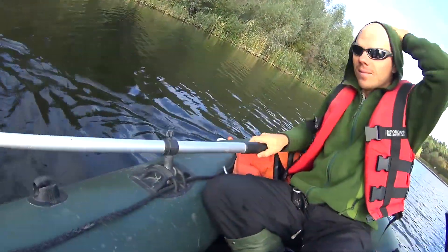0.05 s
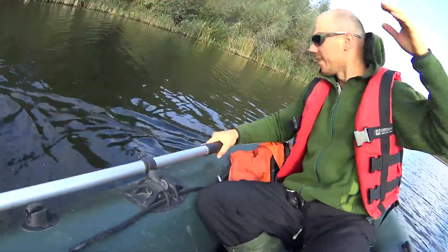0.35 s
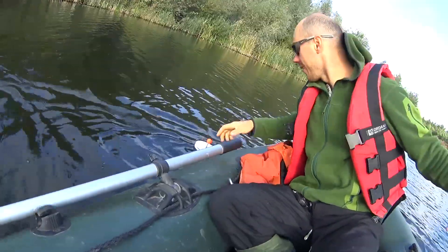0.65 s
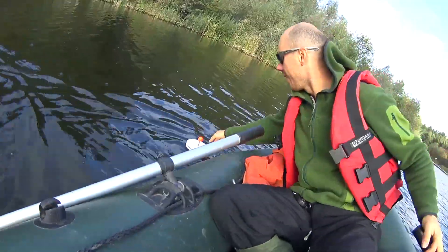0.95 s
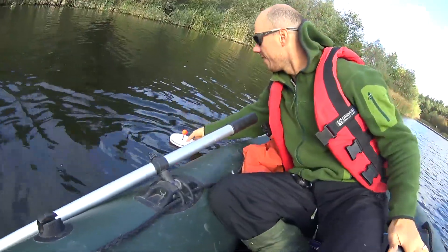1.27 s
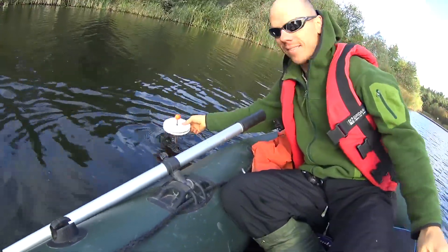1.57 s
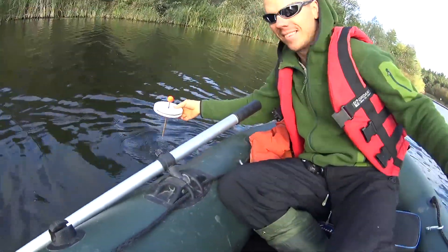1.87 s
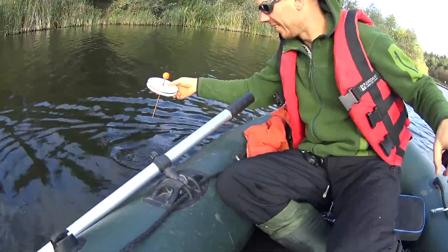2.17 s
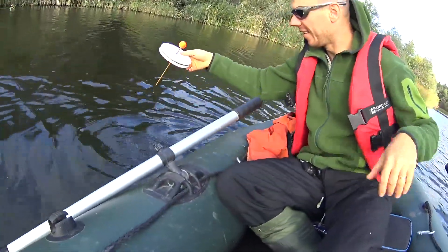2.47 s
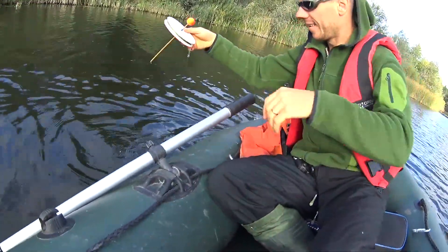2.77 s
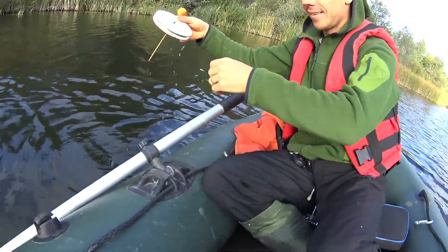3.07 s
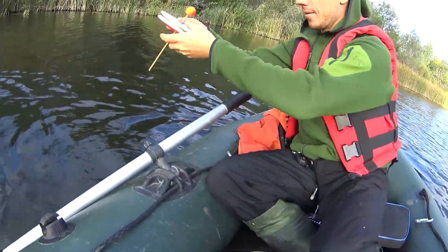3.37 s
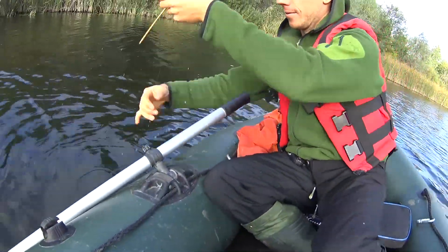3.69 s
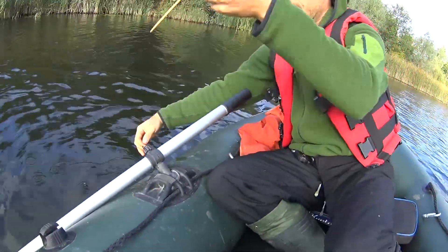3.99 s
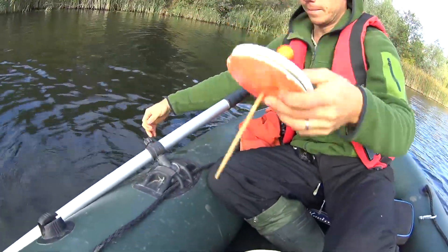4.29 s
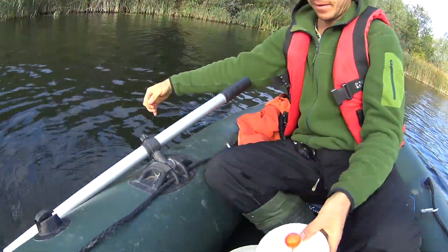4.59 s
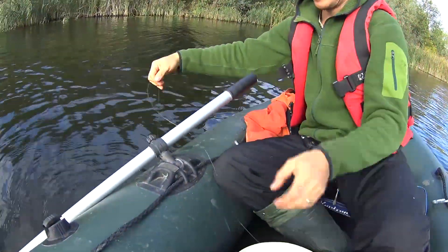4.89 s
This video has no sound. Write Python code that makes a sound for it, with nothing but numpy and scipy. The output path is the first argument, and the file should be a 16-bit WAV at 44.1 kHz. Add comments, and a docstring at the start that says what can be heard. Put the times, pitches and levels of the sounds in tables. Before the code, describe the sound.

Oar knocks and small splashes beside an inflatable boat, with light wind puffs, rustling clothes and a brief plastic clatter.

```python
"""An oar knocks and clatters in its oarlock, heard from an inflatable boat drifting on a quiet river.
Water laps and drips as a fishing float is lifted out, sleeves rustle, and the plastic float clatters down.
Each knock is a short crack that sets the struck thing ringing; the water is tiny ringing bubbles and spray.
Light wind puffs on the microphone, and a small bird sings from the bank."""
import sys
import numpy as np
from scipy import signal
from scipy.fft import rfft, irfft
from scipy.io import wavfile

SR = 44100
rng = np.random.default_rng(int(sys.argv[2]) if len(sys.argv) > 2 else 0)


def wrap_up_sound(samples):
    """Save the sound to the file named by the first command line argument, as 16-bit audio."""
    columns = np.atleast_2d(samples).T
    # keep every value between -1 and 1, then stretch to whole-number steps
    tamed = np.clip(columns, -1, 1)
    steps = np.round(tamed * 32767).astype(np.int16)
    wavfile.write(sys.argv[1], SR, steps)


N = 222308
TIME = np.arange(N) / SR
AGE = TIME[:SR // 4]  # seconds since one short sound began

# A ring time (t60) is how long a sound takes to fade by 60 dB. Pan is left minus right.
# Blows on the oar, oarlock and float. Each row: start in seconds, crack level in dB, crack pitch in Hz,
# crack ring time in seconds, ringing level in dB above the crack, brightness in Hz,
# chatter time in seconds, pan in dB.
OAR_THUDS = [(.3469, -7.5, 870, 0.0038, -3.5, 9000, 0.00032, 2.5),
             (.3852, -25.5, 1010, 0.0049, -2.5, 14000, 0.00087, 4),
             (.4435, -33.5, 695, 0.0065, 0.5, 6000, .002, -1)]
OARLOCK_CLACKS = [(.7665, -34.5, 400, 0.0082, 9.5, 6140, 0.0093, 3),
                  (.7745, -28, 495, 0.034, 8, 9000, 0.0081, 4.4),
                  (.783, -24.5, 506, 0.02, -12, 5500, .008, 1.7),
                  (.8772, -21.5, 2500, 0.0059, 3.5, 18000, 0.0087, 9.4),
                  (.8853, -11.5, 1610, 0.0065, -7.5, 8000, 0.0033, 4.1),
                  (.8882, -9, 2610, 0.0052, -7.5, 7900, 0.0018, 5.6),
                  (.8925, -22.5, 3000, 0.014, 0.5, 7960, 0.016, 3),
                  (.899, -38, 3200, .01, -8, 9000, .004, 4),
                  (.9103, -23, 1250, 0.016, -3, 4500, 0.0033, 6.9)]
FLOAT_KNOCKS = [(4.8022, -24.5, 2230, 0.008, -6, 4000, 0.0017, -6),
                (4.8045, -25, 1550, 0.038, 4.5, 3800, 0.0011, -3),
                (4.8978, -19.5, 2380, 0.013, 11, 20000, 0.0033, -1),
                (4.9005, -11.5, 1600, 0.015, 2, 9900, 0.0033, -3),
                (4.9075, -17.5, 674, 0.035, 0, 3500, 0.0021, 0),
                (4.9145, -25, 1440, 0.01, 11.5, 14000, 0.0052, -1.5),
                (4.931, -18.5, 1020, 0.013, -1, 14000, 0.0044, -0.5),
                (4.94, -24.5, 1017, 0.053, 3, 1980, 0.0022, -4),
                (4.9675, -26.5, 1460, 0.027, -2, 3000, 0.0039, -3),
                (5.0283, -7, 2490, 0.0018, -7, 3040, 0.0018, -3),
                (5.031, -22.5, 177, 0.1, 1, 2620, 0.0049, 0)]
# The tones each thing rings with. Each row: pitch in Hz, relative level in dB, ring time in seconds.
OAR_TONES = [(191.3, 3.5, 0.13), (575, 1, 0.027), (940, -9.5, 0.07), (1270, 6, 0.018), (2600, -5.5, 0.032),
             (3100, -5, 0.03), (4400, -9, 0.021), (7030, -5.5, 0.053)]
OARLOCK_TONES = [(110, -11, 0.082), (365, -9, 0.028), (1241, -11, 0.11), (2250, -2, .03),
                 (2990, 0.5, 0.041), (5180, 0, 0.034), (5730, -2, .04), (7160, -12, .04)]
FLOAT_TONES = [(179, -13, 0.049), (354, -10, 0.072), (753, -3, 0.048), (1027, -4, 0.096),
               (1380, -2.5, 0.065), (1630, -1, 0.044), (1780, -20, 0.029), (2220, 6.5, 0.031),
               (2770, -19, .05), (4870, -13, 0.042), (5940, -3, 0.052), (6850, 0, .05)]
# Their many other tones, so close that they blur. Each row: frequency in Hz, relative level in dB.
OAR_BODY = [(60, -19), (130, 4), (220, 13), (400, -1), (900, -16), (1900, -28), (2700, -22), (3600, -25),
            (7200, -29), (16000, -32)]
OARLOCK_BODY = [(47, -36), (80, -32), (550, -19), (980, -6), (1740, -9), (2330, -12), (4520, -7),
                (5900, -14), (7870, -16), (14000, -9.5), (16000, -23)]
FLOAT_BODY = [(47, -50), (80, -30), (232, -3), (420, -10), (702, -26), (896, -14), (1050, -8.5),
              (2840, -1.5), (3620, -10.5), (4830, -7), (8790, -8), (11200, -4), (16000, -13)]

# Tiny hits. Each row: start in seconds, peak level in dB, middle frequency in Hz, pan in dB.
TACKLE_TICKS = [(3.0278, -24, 6150, -1), (3.038, -35, 8000, -4), (3.1176, -27, 6300, 0),
                (3.6692, -32.5, 4950, 1), (4.3906, -23.5, 11000, 2), (4.441, -32.5, 9000, -1),
                (4.4838, -22.5, 3670, -1), (4.5, -32, 7000, -1), (4.5284, -19.5, 7860, -1),
                (4.5366, -18, 10900, 0), (4.5625, -26, 11000, -1), (4.5852, -20, 9800, -2.5),
                (4.998, -26.5, 6600, -1)]  # fishing tackle and buckles
DROPS_AND_SLAP = [(.147, -35, 4500, 9), (.3703, -29, 4560, 3), (.499, -34, 10700, 5), (.6998, -28, 5270, 7),
                  (.7366, -29, 3500, 6), (.7607, -30, 7500, 4), (.7985, -31, 13000, 0),
                  (.9297, -25, 8950, 4), (1.1128, -20, 905, 6), (1.1436, -22, 1940, -10),
                  (1.681, -27.5, 4840, 2), (1.857, -29, 4330, -11), (1.926, -25.5, 2700, -7),
                  (1.961, -35, 3660, -9), (1.9867, -33, 5060, -11), (2.458, -32.5, 3040, 1),
                  (2.4854, -27, 3460, -7), (2.502, -33.5, 2200, -3)]  # drops tick on the boat and water, and the float slaps the water once
HAND_TAPS = [(3.143, -39.5, 298, 0), (3.2235, -29.5, 740, -4.5), (3.496, -38, 670, -3),
             (3.668, -33.5, 740, 1), (3.795, -38.5, 600, -2), (4.391, -43, 700, 0)]  # hands tap dully on the hull
# Single bubbles. Each row: start in seconds, peak level in dB, pitch in Hz,
# rise in octaves per ring time, pan in dB.
BUBBLES = [(.001, -32.5, 1450, -0.2, 11), (.146, -39, 1170, -1, 13), (.303, -34, 3160, 2.5, 10),
           (0.3692, -27.5, 2875, 3, 7.5), (0.5142, -36.5, 1640, 0.5, 16), (0.5696, -37, 2210, 1.2, 13),
           (.9937, -33, 4670, 1, 10), (1.02, -32.5, 322, 1.5, 11), (1.0317, -30.5, 2080, 1.2, 5),
           (1.1128, -22.5, 535, 0.5, 2), (1.15, -27, 754, 0.2, -4), (1.173, -28, 581, 0, -2),
           (1.2174, -31, 2300, 1, 8), (1.44, -39, 4020, .1, -8), (1.49, -35, 1850, 2.7, 4),
           (1.6818, -37, 3940, 0.5, 4), (1.811, -37.5, 1056, .1, -2), (1.897, -36, 1140, 0.8, -8),
           (1.926, -34.5, 2380, 0, -6), (1.953, -32, 1205, 1.5, -11), (1.9854, -33.5, 782, 0.5, -7),
           (2.287, -41.5, 1177, 0.8, -9), (2.6826, -37.5, 1930, 1, -11), (2.7063, -38.5, 2030, 1.2, 4),
           (2.85, -34.5, 1060, -0.3, 2), (4.27, -35, 342, -0.2, -2), (4.738, -36.5, 1130, 2, -10)]
# Splashes. Each row: start in seconds, relative level in dB, length in seconds.
SPLASHES = [(1.103, -40, 0.049), (1.144, -35.5, 0.066), (1.236, -45, 0.09), (1.95, -41.5, 0.015)]
# Soft puffs of wind. Each row: start in seconds, peak level in dB, middle frequency in Hz,
# length in seconds.
PUFFS = [(.031, -32, 128, 0.043), (0.162, -22, 143, .035), (0.201, -20.5, 214, 0.011),
         (0.79, -29, 111, 0.02), (1.185, -24, 195, 0.052), (1.256, -24.5, 278, 0.0094),
         (1.289, -14.5, 236, 0.015), (1.307, -21, 240, 0.033), (1.351, -26.5, 168, 0.04),
         (2.379, -25, 134, 0.016), (2.397, -20.5, 270, .022), (2.494, -16, 300, 0.017),
         (2.822, -31, 113, .04), (3.226, -36, 179, .013), (3.26, -36.5, 125, 0.021), (3.63, -35, 107, .02)]

# Sounds that swell and fade. Each row: time of full strength in seconds, relative level in dB,
# time held in seconds.
WASHES = [(0, -49.5, 0.4), (.42, -45.5, 0.089), (.7, -49, 0.24), (1.07, -42.5, 0.33), (1.93, -57, .04),
          (2.85, -51.5, 0.073)]  # ripples reach the hull
POURS = [(1.66, -55, .14), (1.85, -43, 0.0041), (1.95, -45, 0.04), (2.05, -48, 0.17), (2.46, -45, 0.011)]  # water runs off the float
GUSTS = [(0, -46, .02), (.17, -39, 0.023), (.86, -42, 0.14), (1.29, -43.5, 0.034), (1.72, -48.5, 0.39),
         (2.38, -49, 0.042), (2.82, -47, 0.089), (4.0, -56, .02), (4.48, -49.5, .14)]
SLEEVE_STROKES = [(2.72, -52, 0.042), (2.93, -54, 0.21), (3.28, -47, .115), (3.58, -50, 0.11),
                  (3.76, -56, 0.35), (4.47, -53.5, 0.16), (4.67, -52, 0.099), (5.01, -43.5, .05)]
JACKET_RUBS = [(3.0, -58.5, .95), (4.13, -50, 0.13), (4.45, -43, .05), (4.6, -51, 0.13), (5.0, -56, .04)]
ROCKING = [(.75, -56, 2.2)]  # the hull rocks under a shifting weight
# The bird's whistles. Each row: start in seconds, peak level in dB, pitch in Hz.
WHISTLES = [(4.6, -48, 6950), (4.735, -51, 6840)]

# The colour of each noise, from bass to treble. Each row: frequency in Hz, relative level in dB.
WATER_COLOUR = [(200, -17), (450, -4.5), (750, -1), (1300, -8.5), (2300, -2), (4000, -7), (6000, -11),
                (8000, -17.5), (10000, -15), (11700, -14), (16000, -21)]
DRIP_COLOUR = [(300, -22), (600, -9), (1200, -15), (2500, 1), (5000, 7), (8000, -6), (11700, 4.5),
               (16000, -5)]
SPATTER_COLOUR = [(1500, -14), (4000, 11.5), (6000, 13.5), (8500, -7.5), (11500, 10.5), (16000, -10)]
WIND_COLOUR = [(20, -16), (45, -14.5), (95, 3), (170, -9), (300, -9), (600, -25), (2000, -79)]
SLEEVE_COLOUR = [(800, -1), (2400, 8), (4000, 6.5), (5500, 7.5), (7500, 0), (10000, 0.5), (11800, 6.5),
                 (13500, -1.5), (15500, 3.5)]
JACKET_COLOUR = [(100, -23), (350, 0), (900, -2.5), (1600, -8), (3000, -12.5), (7000, -28), (16000, -29)]
RIVER_COLOUR = [(18, -39), (30, 2.5), (77, 13), (153, 5), (259, 9), (801, 2.5), (1190, 0.5), (4080, -4.5),
                (6210, -10), (7670, -18), (9970, -16.5), (11700, -11.5), (14800, -24), (16000, -14)]

WASH_ATTACK_S, WASH_RELEASE_S = 0.15, 0.14  # how slowly a ripple swells and fades


def knocks(blows, tones, body, body_t60, tones_db, width, chatter_db, left_delay_s):
    """Each blow is a short crack; the contact then chatters and makes the struck thing ring."""
    out = np.zeros((2, N))
    ring = unit(sum(undb(db) * fade(t60) * np.sin(2 * np.pi * hz * AGE) * (-1) ** k
                    for k, (hz, db, t60) in enumerate(tones)))
    for s, db, hz, t60, ringing_db, bright_hz, chatter_s, pan_db in blows:
        blur = unit(colour(stereo_noise(width, len(AGE)), body) * fade(body_t60))
        contact = undb(chatter_db) * rng.standard_normal(len(AGE)) * np.exp(-AGE / chatter_s)
        contact *= rng.random(len(AGE)) < .15  # keep only scattered little bounces
        contact[0] = 1  # the first hit
        # a softer contact takes the treble away
        soft = np.exp(-2 * np.pi * bright_hz / SR)
        contact = signal.lfilter([1], np.poly([soft, soft]), contact)
        ringing = signal.fftconvolve(blur + undb(tones_db) * ring, contact[None])[:, :len(AGE)]
        crack = unit(band(np.sin(2 * np.pi * hz * AGE) * fade(t60), hz, spread=4.1))
        add(out, s, crack + undb(ringing_db) * unit(ringing), db, pan_db)
    return np.array([np.interp(TIME - left_delay_s, TIME, out[0]), out[1]])


def skid(peak_s=5.026, peak_db=-20):
    """The plastic float slides into its last knock with a short, swelling hiss."""
    hiss = band(stereo_noise(.08, N), hz=9800, spread=2.0)
    return unit(hiss * swells([(peak_s, 0, 0)], attack_s=0.01, release_s=0.0058)) * undb(peak_db)


def ticks(rows, t60, spread, width):
    """Tiny hits, each a quickly fading burst of noise."""
    out = np.zeros((2, N))
    for s, db, hz, pan_db in rows:
        burst = stereo_noise(width, len(AGE)) * fade(t60)
        add(out, s, unit(band(burst, hz, spread)), db, pan_db)
    return out


def plops(stray_db=-13, lean_db=8, cross_s=0.5):
    """Single bubbles plop by the boat; faint strays come with the ripples and drift from left to right."""
    out = np.zeros((2, N))
    for s, db, hz, rise, pan_db in BUBBLES:
        t60 = 0.05 / (hz / 1000) ** .4  # small, high bubbles die sooner
        add(out, s, bubble(hz, t60, rise), db, pan_db)
    strays = swarm(count=70, scatter_db=-0.5, cycles=51, low_hz=920, high_hz=4590, tilt_db=13, climb=0.83)
    drift = pan(lean_db * np.tanh(2 * (cross_s - TIME)))
    return out + undb(stray_db) * strays * swells(WASHES, WASH_ATTACK_S, WASH_RELEASE_S) * drift


def lapping(ripple_db=-3, fizz_db=-5, spatter_db=-10, froth_db=-8):
    """Ripples lap and fizz along the hull; a hand and the float stir up thicker splashes."""
    washes = swells(WASHES, WASH_ATTACK_S, WASH_RELEASE_S) * pan(2)
    splashes = sum(undb(db) * np.exp(-((TIME - s) / length * 2 - 1) ** 4) for s, db, length in SPLASHES)
    fizz = swarm(count=700, scatter_db=2.8, cycles=30, low_hz=900, high_hz=6000, tilt_db=-2, climb=.45)
    froth = swarm(count=1500, scatter_db=1, cycles=14, low_hz=725, high_hz=5060, tilt_db=-5, climb=0.72)
    ripples = undb(ripple_db) * (undb(fizz_db) * fizz + spray(WATER_COLOUR, scatter_db=2.5, width=0.65))
    slosh = undb(froth_db) * froth + spray(WATER_COLOUR, scatter_db=3.0, width=0.3)
    droplets = undb(spatter_db) * spatter(per_s=14, t60=0.012)
    return (ripples + droplets) * washes + slosh * splashes


def trickle(gurgle_db=-5, chirp_db=-8, patter_db=-4, spatter_db=-7, thins_at_s=1.97, thinning_s=0.13):
    """Water runs off the lifted float: drops patter and chirp, then a thin stream only gurgles."""
    gurgle = swarm(count=1200, scatter_db=3.5, cycles=25, low_hz=513, high_hz=2430, tilt_db=-.5, climb=.8)
    chirps = swarm(count=450, scatter_db=3.5, cycles=30, low_hz=2200, high_hz=9000, tilt_db=-1, climb=.5)
    drops = undb(chirp_db) * chirps + undb(patter_db) * spray(DRIP_COLOUR, scatter_db=6.0, width=0.66)
    drops += undb(spatter_db) * spatter(per_s=8.3, t60=0.026)
    thinning = np.exp(-np.maximum(TIME - thins_at_s, 0) / thinning_s)
    flow = swells(POURS, attack_s=0.05, release_s=0.052)
    return (undb(gurgle_db) * gurgle + drops * thinning) * flow * pan(-3)


def bubble(hz, t60, rise, onset_s=0.000089):
    """A pocket of air rings; a positive rise lifts its pitch, as when it nears the surface."""
    age = AGE[:int(t60 * SR) + 8]
    pitch = hz * 2 ** (rise * age / t60)
    tone = np.sin(2 * np.pi * np.cumsum(pitch) / SR)
    return unit(tone * np.exp(-np.log(1000) * age / t60) * (1 - np.exp(-age / onset_s)))


def swarm(count, scatter_db, cycles, low_hz, high_hz, tilt_db, climb, span_s=3.0):
    """Little bubbles burst at random, each ringing for roughly the given number of cycles."""
    out = np.zeros((2, N))
    for k, (when, pitch, length, rise, strength, side) in enumerate(rng.random((count, 6))):
        hz = low_hz * (high_hz / low_hz) ** pitch
        db = scatter_db * min(-np.log(1 - strength), 3) + tilt_db * pitch
        t60 = cycles * (0.354 + length) / hz
        add(out, (k + when) / count * span_s, bubble(hz, t60, climb * rise), db, pan_db=14 * (side - .5))
    return out / out.std()


def spray(points, scatter_db, width):
    """Countless droplets of very unequal size crackle."""
    sizes = undb(scatter_db * np.minimum(rng.exponential(size=N // 32 + 1), 5))
    return colour(stereo_noise(width, N) * np.repeat(sizes, 32)[:N], points)


def spatter(per_s, t60):
    """Lone fine droplets tick on the hull and the water."""
    hits = (rng.random((2, N)) < per_s / SR) * rng.uniform(0.19, 1, (2, N)) ** 2
    hits = hits + 2.1 * hits[::-1]  # each is heard on both sides, louder on one
    bursts = signal.fftconvolve(hits, fade(t60)[None])[:, :N] * rng.standard_normal(N)
    return colour(bursts, SPATTER_COLOUR)


def wind(rumble_db=-1, apart_hz=190):
    """Wind rumbles and puffs on the microphone; the smaller a swirl, the more left and right differ."""
    flutter_db = 2.5 * colour(rng.standard_normal(N), [(10, 0), (25, -10), (60, -60)])
    gusts = swells(GUSTS, attack_s=0.07, release_s=0.091)
    out = colour(stereo_noise(0.34, N), WIND_COLOUR) * gusts * undb(rumble_db + flutter_db)
    for s, db, hz, length in PUFFS:
        swirl = stereo_noise((hz / apart_hz) ** 2, len(AGE)) * np.exp(-(AGE / length * 2 - .7) ** 2)
        add(out, s, unit(band(swirl, hz, spread=1.474)), db)
    return out


def clothes(hiss_db=-1):
    """Fleece sleeves hiss and the life jacket rubs as fibres catch and slip."""
    grain = undb(2 * np.repeat(rng.standard_normal(N // 24 + 1), 24)[:N])
    hiss = colour(stereo_noise(0.074, N) * grain, SLEEVE_COLOUR)
    hiss *= swells(SLEEVE_STROKES, attack_s=0.088, release_s=0.041)
    rub = colour(stereo_noise(0.47, N) * grain, JACKET_COLOUR)
    rub *= swells(JACKET_RUBS, attack_s=0.11, release_s=.09)
    return undb(hiss_db) * hiss + rub


def bird(start_s=3.458, song_db=-42.5, song_hz=3850, count=11, rise_octaves=0.19, soft_start_db=-5):
    """A bird sings buzzy notes that slow, lengthen and rise at the end, then two thin falling whistles."""
    out, s = np.zeros((2, N)), start_s
    for k in range(count):
        ending = (k / (count - 1)) ** 5  # stays near 0, then climbs to 1 on the last note
        hz = song_hz * 2 ** (rise_octaves * np.sin(np.pi / 2 * ending))
        note = bird_note(hz, length_s=0.031 + 0.081 * ending, buzz=0.18, slide_octaves=-.03)
        add(out, s, note, song_db + soft_start_db * np.exp(-k))
        s += .053 + .15 * ending
    for s, db, hz in WHISTLES:
        add(out, s, bird_note(hz, length_s=0.091, buzz=0.046, slide_octaves=-0.15), db)
    return out


def bird_note(hz, length_s, buzz, slide_octaves, trill_hz=130, hoarse=.35, echo_t60=.11):
    """One hoarse note with a fast wobble in pitch, smeared by echoes from reeds and trees."""
    progress = np.minimum(AGE / length_s, 1)
    waver = hoarse * colour(rng.standard_normal(len(AGE)), [(100, -26), (300, 17), (700, 5), (1500, -35)])
    trill = 0.66 * np.sin(2 * np.pi * trill_hz * AGE)
    pitch = hz * 2 ** (slide_octaves * progress) * (1 + buzz * (trill + waver))
    tone = np.sin(2 * np.pi * np.cumsum(pitch) / SR) * np.sin(np.pi * progress)
    echoes = stereo_noise(0.47, len(AGE)) * fade(echo_t60)
    return unit(signal.fftconvolve(tone[None], echoes))


def hull():
    """The air tubes rumble softly while the boat rocks."""
    rumble = band(stereo_noise(0.31, N), hz=48, spread=1.7)
    return rumble / rumble.std() * swells(ROCKING, attack_s=0.6, release_s=.12)


def river(level_db=-55, width=0.57, wide_above_hz=250):
    """Open water and reeds make a steady hush; its bass is alike on both sides."""
    shared, opposed = colour(rng.standard_normal((2, N)), RIVER_COLOUR)
    bass_cut = signal.butter(1, wide_above_hz, "high", fs=SR, output="sos")
    opposed = width * signal.sosfilt(bass_cut, opposed)
    return undb(level_db) * np.array([shared + opposed, shared - opposed])


def undb(db):
    """Turn decibels into a number to multiply by."""
    return 10 ** (np.asarray(db) / 20)


def pan(db):
    """Left and right gains that make the left side louder by db."""
    return undb(np.vstack([db, -db]) / 2)


def fade(t60):
    """A fade that drops 60 dB in t60 seconds."""
    return np.exp(-np.log(1000) * AGE / t60)


def swells(rows, attack_s, release_s):
    """A loudness curve for sounds that rise, hold and die away; their powers add."""
    power = np.zeros(N)
    for s, db, hold in rows:
        away = np.maximum(s - TIME, 0) / attack_s + np.maximum(TIME - s - hold, 0) / release_s
        power += (undb(db) * np.exp(-away)) ** 2
    return np.sqrt(power)


def unit(x):
    """Scale to a peak of one."""
    return x / np.abs(x).max()


def colour(x, points):
    """Shape the bass and treble of x with (Hz, dB) points, then scale to an average (rms) size of one."""
    hz, db = np.transpose(points)
    freqs = np.maximum(np.fft.rfftfreq(x.shape[-1], 1 / SR), 1)
    gain = undb(np.interp(np.log(freqs), np.log(hz), db))
    shaped = irfft(rfft(x) * gain, x.shape[-1])
    return shaped / shaped.std()


def band(x, hz, spread):
    """Keep the frequencies from hz / spread to hz * spread."""
    edges = [hz / spread, min(hz * spread, .45 * SR)]
    return signal.sosfilt(signal.butter(2, edges, "band", fs=SR, output="sos"), x)


def stereo_noise(width, size):
    """Noise for left and right; at a width of 0 both sides are the same."""
    shared, opposed = rng.standard_normal((2, size))
    return np.array([shared + width * opposed, shared - width * opposed]) / np.hypot(1, width)


def add(out, s, sound, db, pan_db=0):
    """Mix a sound in at a time, level and side."""
    start = int(s * SR)
    sound = sound * undb(db) * pan(pan_db)
    out[:, start:start + sound.shape[1]] += sound[:, :N - start]


def scene():
    """Everything heard from the boat."""
    oar = knocks(OAR_THUDS, OAR_TONES, OAR_BODY, body_t60=0.088,
                 tones_db=7.0, width=0.11, chatter_db=-33, left_delay_s=.00005)
    oarlock = knocks(OARLOCK_CLACKS, OARLOCK_TONES, OARLOCK_BODY, body_t60=0.076,
                     tones_db=-8.0, width=0.49, chatter_db=-7.0, left_delay_s=.00004)
    fishing_float = knocks(FLOAT_KNOCKS, FLOAT_TONES, FLOAT_BODY, body_t60=0.039,
                           tones_db=-5.5, width=0.069, chatter_db=-9.5, left_delay_s=0)
    tackle = ticks(TACKLE_TICKS, t60=0.015, spread=1.97, width=0.063)
    drops_and_slap = ticks(DROPS_AND_SLAP, t60=0.016, spread=1.65, width=.09)
    taps = ticks(HAND_TAPS, t60=0.029, spread=1.31, width=0.18)
    boat = oar + oarlock + fishing_float + skid() + tackle + taps + hull()
    water = drops_and_slap + plops() + lapping() + trickle()
    return boat + water + wind() + clothes() + bird() + river()


def record(dry):
    """Cut away the highest treble, above 16100 Hz."""
    return signal.sosfilt(signal.ellip(10, .2, 80, 16100, fs=SR, output="sos"), dry)


dry = scene()
out = record(dry)
wrap_up_sound(out)
```